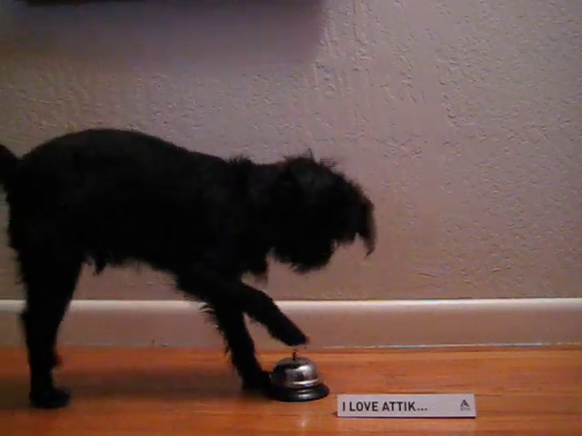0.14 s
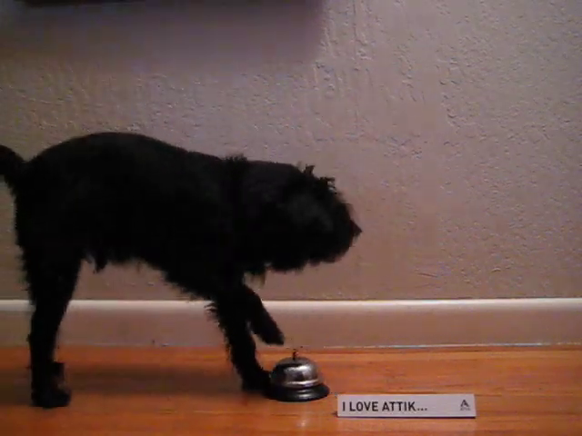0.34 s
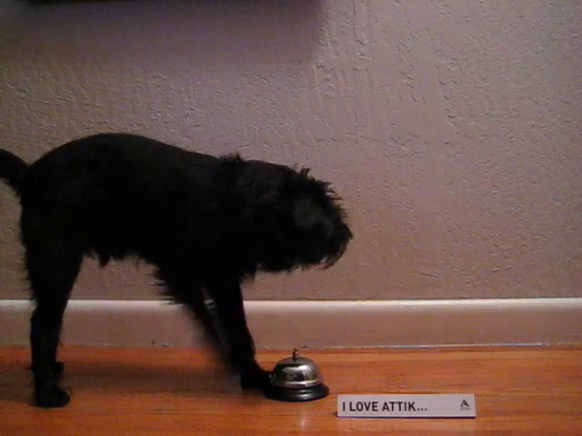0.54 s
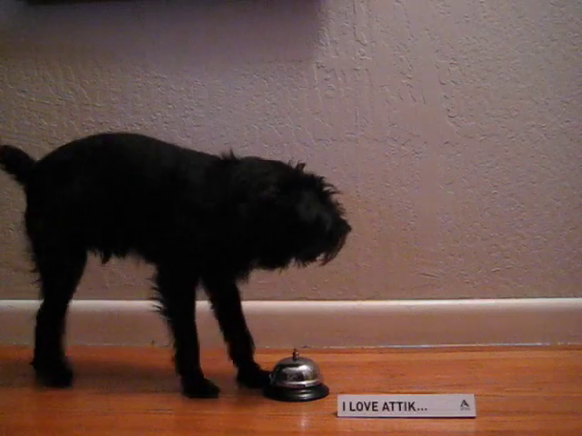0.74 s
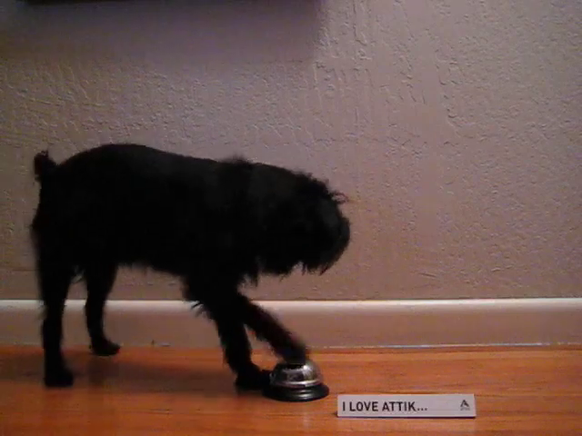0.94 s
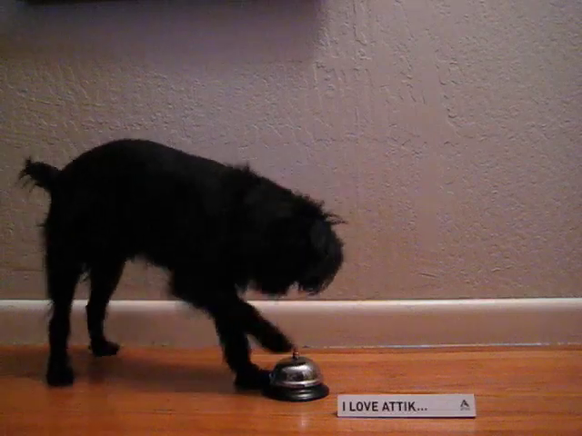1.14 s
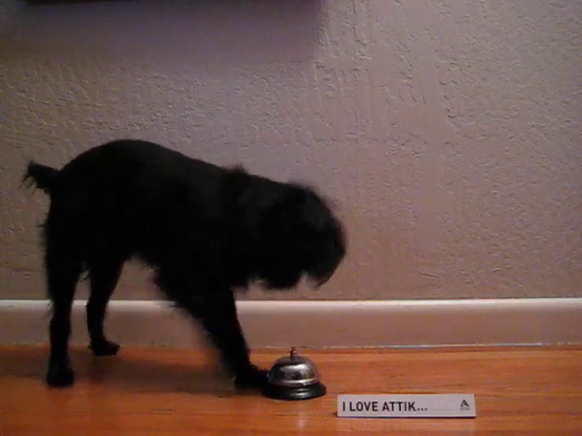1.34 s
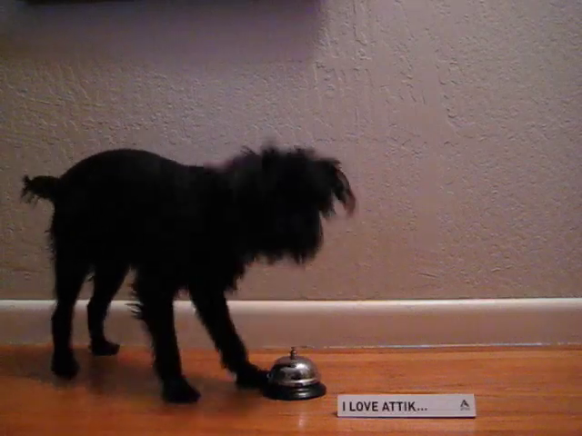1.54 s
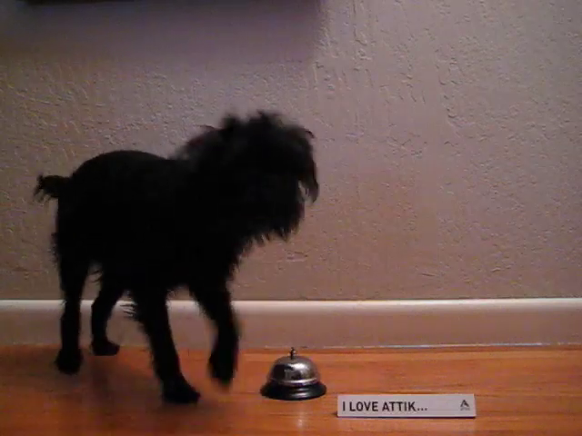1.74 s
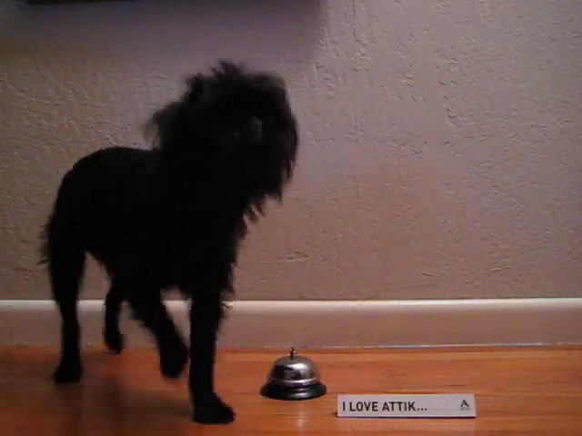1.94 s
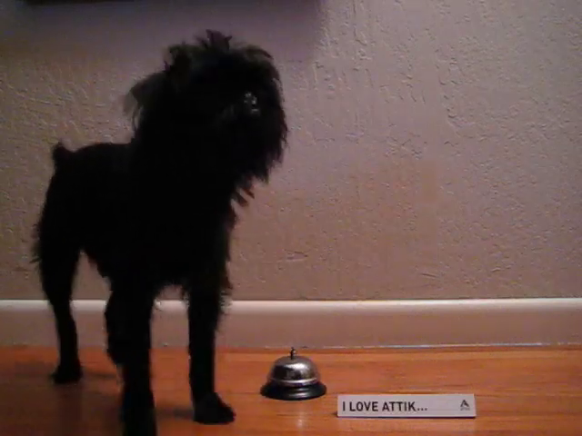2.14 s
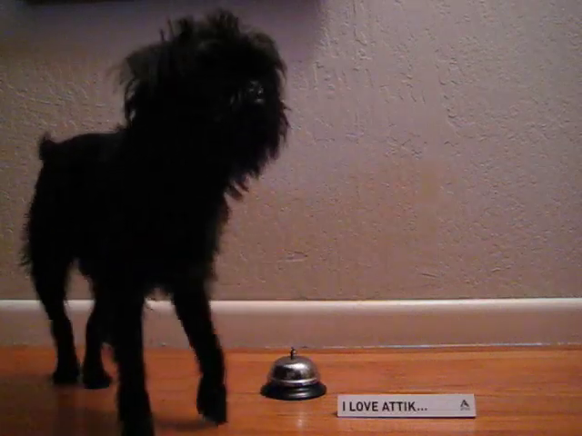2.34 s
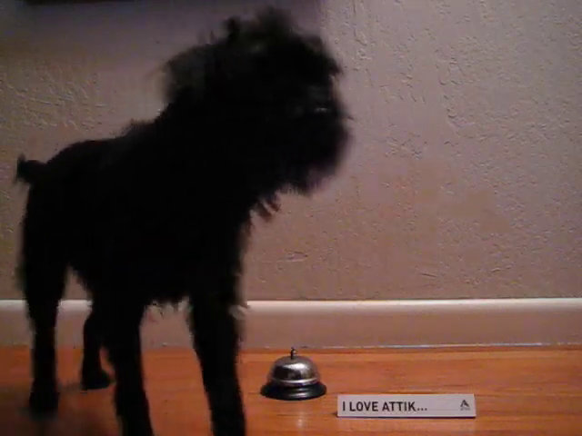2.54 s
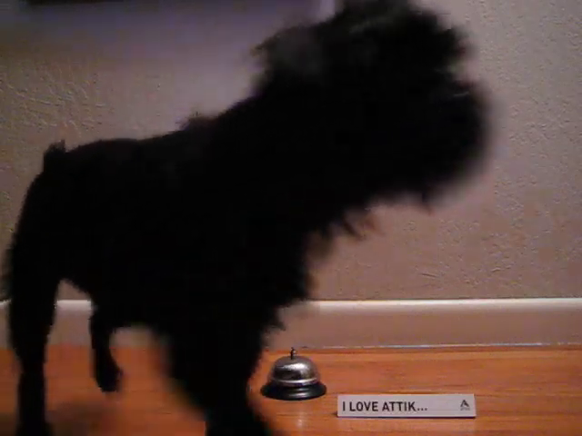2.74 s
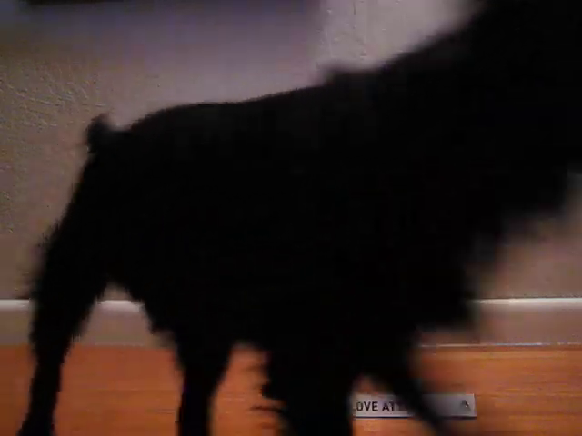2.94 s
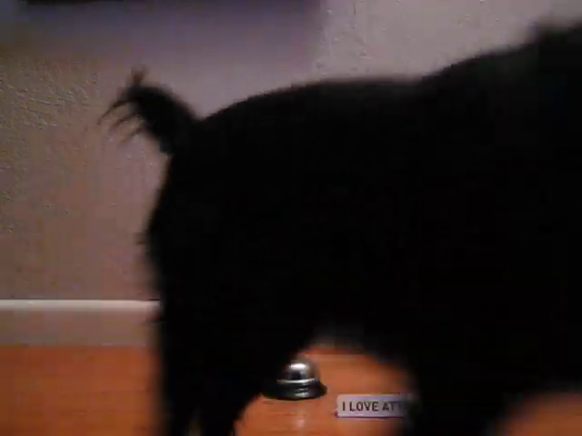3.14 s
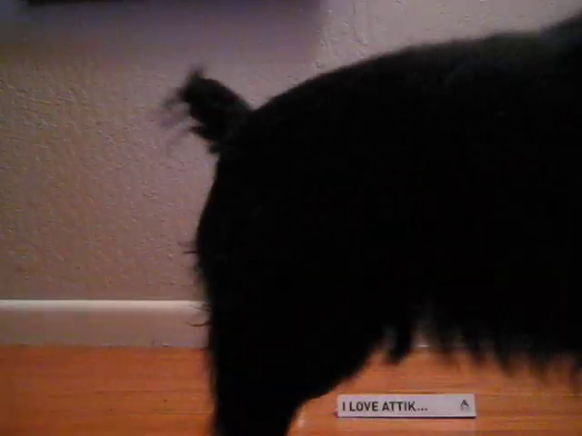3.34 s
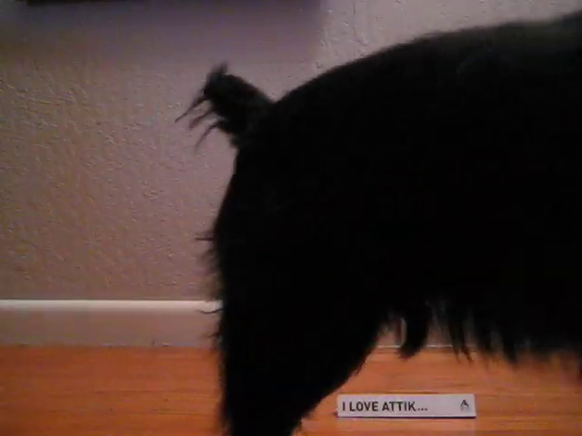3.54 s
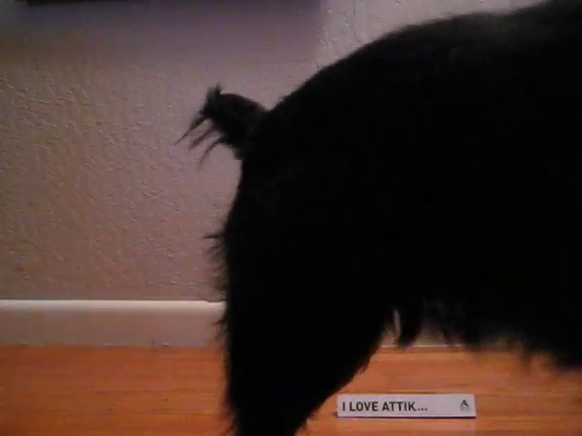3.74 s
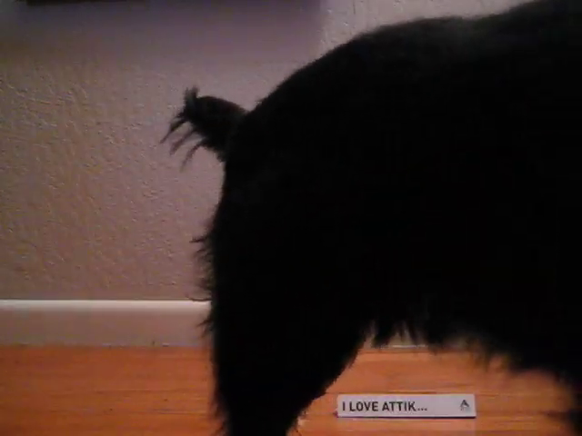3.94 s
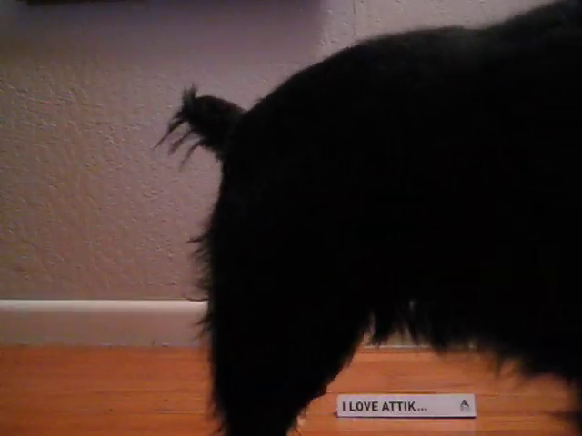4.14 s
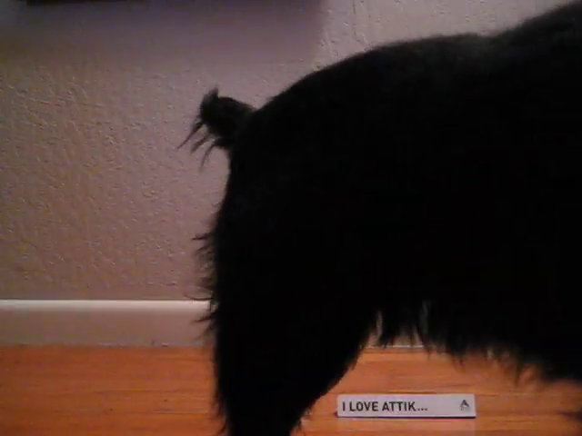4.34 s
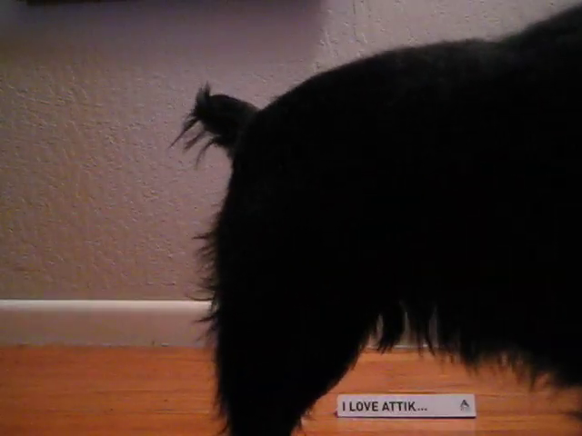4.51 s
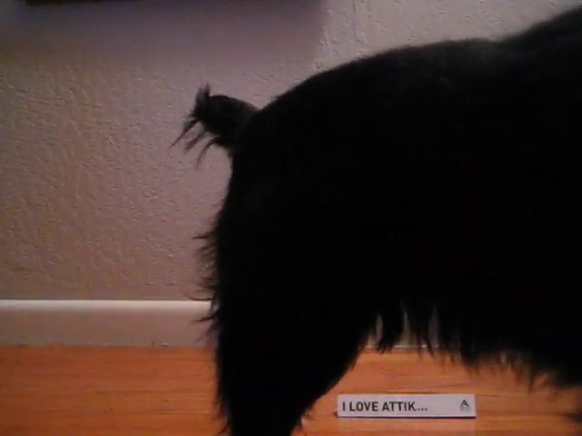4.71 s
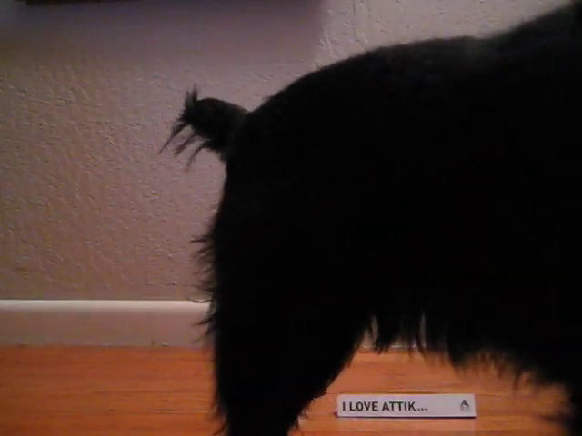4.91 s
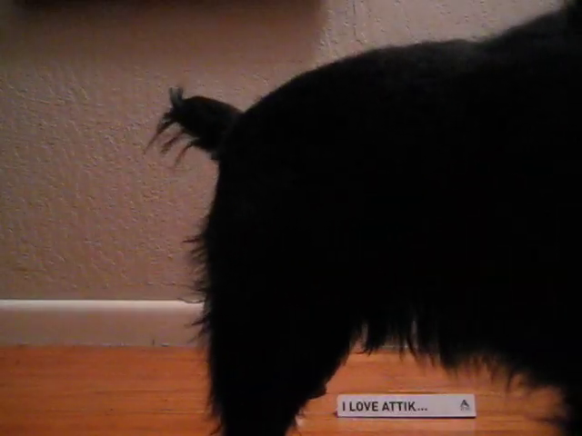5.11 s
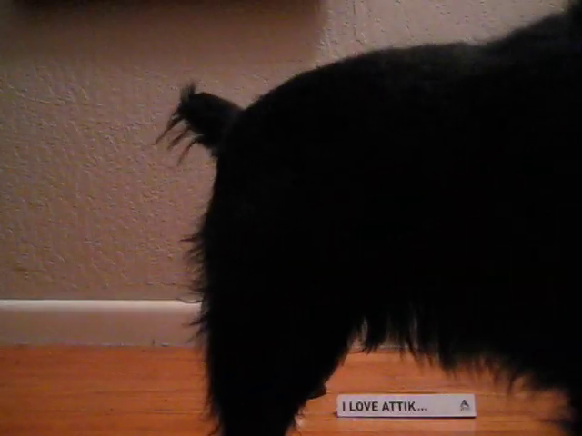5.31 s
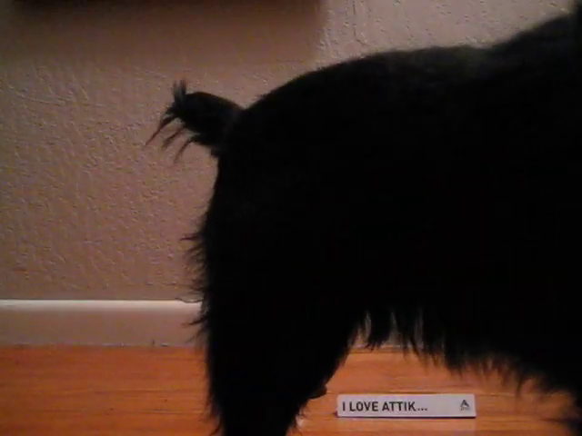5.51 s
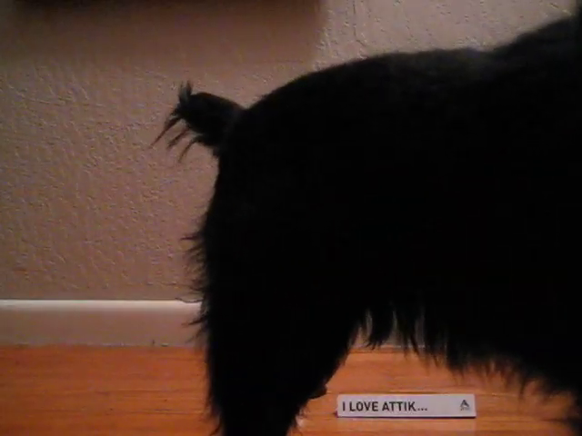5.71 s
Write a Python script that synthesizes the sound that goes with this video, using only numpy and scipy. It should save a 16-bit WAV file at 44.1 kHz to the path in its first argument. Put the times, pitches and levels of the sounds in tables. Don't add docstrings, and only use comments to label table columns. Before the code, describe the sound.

Indoors on a wooden floor, a dog's paw taps a steel desk bell: light metallic clicks, one hard plunger tap, then a bright piercing ding. The ring wavers and fades slowly while claws tick closer, followed by small scuffs and fur brushing right by the microphone. A steady fan rush with a thin whine sits behind and dips briefly under the strike.

```python
import sys
import numpy as np
from scipy import signal
from scipy.fft import rfft, irfft, next_fast_len
from scipy.io import wavfile
from scipy.ndimage import uniform_filter1d, minimum_filter1d

SR = 44100
rng = np.random.default_rng(int(sys.argv[2]) if len(sys.argv) > 2 else 0)


def bounce(signal):
    frames = np.transpose(np.atleast_2d(signal))
    limited = np.clip(frames, -1, 1)
    pcm = np.round(limited * 32767).astype(np.int16)
    wavfile.write(sys.argv[1], SR, pcm)


def ratio_of_db(decibels):
    return 10 ** (np.asarray(decibels, float) / 20)


N = 258867
T = np.arange(N) / SR
STRIKE_S = 1.3018


def curve(rows):
    return np.interp(T, *np.transpose(rows))


def fall(t, t60):
    return np.exp(-np.log(1000) * t / max(t60, 1e-4))


def band(x, lo_hz, hi_hz):
    return signal.sosfilt(signal.butter(2, [lo_hz, hi_hz], "band", fs=SR, output="sos"), x)


def add(out, s, x):
    i = int(s * SR)
    out[i:i + len(x)] += x[:N - i]


def add_peak(out, s, db, x):
    add(out, s, ratio_of_db(db) * x / np.abs(x).max())


def coloured(gain_at):
    n = next_fast_len(N)
    x = irfft(rfft(rng.standard_normal(n)) * gain_at(np.fft.rfftfreq(n, 1 / SR) + 1), n)[:N]
    return x / x.std()


def narrow(hz, width_hz):
    return coloured(lambda f: 1 / (1 + (2 * (f - hz) / width_hz) ** 2))


DOME_HZ = (1343.72, 3672.55, 6845.3, 10663.5)
# time in seconds, level in dB, share of the beating twin (0-1), lead of the twin in turns.
HUM_PARTIAL = [(1.31, -36.5, 0.15, 0.), (1.7, -32.5, 0.15, 0.075), (2.15, -27.5, 0.22, 0.037),
               (2.72, -31.5, 0.46, 0.), (3.02, -31.5, 0.35, 0.17), (3.4, -37, 0.46, 0.04),
               (4.13, -39, 0.46, 0.02), (4.87, -42.5, 0.74, 0.018), (5.87, -47.5, 0.53, 0.095)]
TONE_PARTIAL = [(1.309, -23.5, 0.13, -0.0041), (1.355, -28.5, 0.99, 0.031), (1.48, -19, 0.15, 0.0046),
                (2.019, -16.5, 0.054, 0.), (2.2, -21, 0.1, 0.0047), (2.46, -18.5, 0.23, -0.0054),
                (2.56, -25, 0.29, 0.), (2.72, -25, 0.47, -0.042), (2.8, -31, 0.85, 0.0021),
                (2.98, -30.5, 0.54, -0.015), (3.2, -39.5, 0.078, -0.011), (3.5, -35, 0.26, -0.013),
                (3.9, -43.5, 0.65, 0.), (4.15, -47.5, 0.71, 0.038), (4.65, -50, 0.55, 0.004),
                (4.87, -53.5, 0.46, -0.0041), (5.3, -59, 0.56, 0.), (5.87, -65, 0.65, 0.)]
UPPER_PARTIAL = [(1.309, -27, 0.9, -0.86), (1.326, -28, .6, -.4), (1.355, -30, 0.99, -0.13),
                 (1.49, -26.5, .5, 0.2), (1.58, -31, 0.41, 0.43), (1.674, -39, 0.33, -0.11),
                 (1.76, -36.5, 1, -0.021), (1.84, -41.5, .45, .08), (2.1, -44.5, 0.39, 0.018),
                 (2.451, -69, .5, 0.22)]
# time in seconds, level in dB.
TOP_PARTIAL = [(1.301, -22), (1.306, -26), (1.318, -33), (1.33, -26), (1.375, -25), (1.44, -31), (1.5, -48),
               (1.68, -58), (1.72, -72)]
# Hz above the partial, a moment in seconds when both cancel.
TWINS = [(2.786, 4.87), (1.405, 4.164), (11.9, 1.76), (13, 1.8)]


def dome():
    t = np.maximum(T - STRIKE_S, 0)
    out = np.zeros(N)
    partials = (HUM_PARTIAL, TONE_PARTIAL, UPPER_PARTIAL, TOP_PARTIAL)
    for hz, rows, (beat_hz, null_s) in zip(DOME_HZ, partials, TWINS):
        level_db = curve([row[:2] for row in rows])
        share, lead = 0.1, 0
        if len(rows[0]) > 2:
            share = curve([(row[0], row[2]) for row in rows])
            lead = curve([(row[0], row[3]) for row in rows])
        twin = np.sin(2 * np.pi * (hz * t + beat_hz * (T - null_s) + lead))
        pair = np.sin(2 * np.pi * hz * t) - np.clip(share, 0, 1) * twin
        if rows is HUM_PARTIAL:
            pair = pair + ratio_of_db(-31) * np.sin(2 * 2 * np.pi * hz * t)
        if rows is TONE_PARTIAL:
            since_dip = T - 1.46
            pump = np.cos(2 * np.pi * TWINS[2][0] * since_dip) * fall(np.maximum(since_dip, 0), 0.35)
            level_db = level_db - 2.4 * pump
        fade = np.exp(-np.maximum(T - rows[-1][0], 0) / 0.05) * (t > 0)
        out += np.sqrt(2) * ratio_of_db(level_db) * fade * pair
    return out


# start in seconds, hum level in dB, tone level in dB, t60 in seconds.
TOUCHES = [
    (0, -45, -46, 0.41),
    (.519, -52, -52, 5.2),
]


def touches():
    out = np.zeros(N)
    for s, hum_db, tone_db, t60 in TOUCHES:
        hum = ratio_of_db(hum_db) * np.sin(2 * np.pi * DOME_HZ[0] * T)
        tone = ratio_of_db(tone_db) * np.sin(2 * np.pi * DOME_HZ[1] * T)
        out += (hum + tone) * fall(np.maximum(T - s, 0), t60) * (T >= s) * (T < STRIKE_S)
    return out


# Hz, peak in dB.
UNCLAMPED = [(3687, -22), (6844, -22), (10318, -17), (11169, -16), (9713, -26), (15266, -34)]
SHORT_HZ = (3187, 3620, 4034, 4393, 4780, 8323, 9318, 10290, 11185, 13960, 14970, 15620)
# level in dB, t60 in seconds, width in Hz.
SHORT_MODES = [(-44.5, 1, 66), (-35, 0.7, 330), (-41.5, 1.8, 70), (-47.5, .6, 90), (-44, 1.06, 120),
               (-44, 0.4, 300), (-41, .33, 90), (-28, 0.45, 130), (-35.5, 0.53, 60), (-49, .16, 300),
               (-41, .25, 220), (-49.5, 0.13, 200)]


def clapper():
    t = np.maximum(T - STRIKE_S, 0)
    struck = T >= STRIKE_S
    opening = struck / (1 + (t / 0.0039) ** 8)
    out = ratio_of_db(-19.5) * band(rng.standard_normal(N) * opening, 250, 11500)
    for hz, db in UNCLAMPED:
        out += opening * ratio_of_db(db) * np.sin(2 * np.pi * hz * t)
    for hz, (db, t60, width_hz) in zip(SHORT_HZ, SHORT_MODES):
        out += ratio_of_db(db) * struck * fall(t, t60) * narrow(hz, width_hz)
    return out


# level in dB, t60 in seconds, low edge in Hz, high edge in Hz.
WASH = [
    (-35.5, 0.95, 4500, 13000),
    (-41.5, .35, 11000, 18000),
    (-40, .5, 1500, 3200),
]


def wash():
    out = np.zeros(N)
    for db, t60, lo_hz, hi_hz in WASH:
        noise = rng.standard_normal(SR) * fall(T[:SR], t60)
        add(out, STRIKE_S, ratio_of_db(db) * band(noise, lo_hz, hi_hz))
    return out


PLUNGER_HZ = (3620, 4450, 4940, 6380, 8450, 9320, 10100, 11300, 15200, 3240)
# width in Hz, level in dB.
PLUNGER_MODES = [(170, 5.5), (200, 7.5), (100, 3.5), (130, 5.5), (150, 2), (60, -2), (120, -11),
                 (80, -12.5), (250, -20), (60, -8)]
# start in seconds, peak in dB, rattle length in seconds, after-ring in dB.
TAPS = [
    (.1146, -34, .004, -40),
    (.333, -39, .014, -25),
    (.5148, -22, .004, -30),
    (.5186, -8, .0035, -21),
    (1.0245, -34, .004, -45),
    (1.2565, -33, .004, -25),
    (1.282, -30, .008, -30),
    (1.2975, -24, .004, -30),
    (1.385, -27, .002, -40),
    (1.4486, -27, .002, -40),
]


def plunger():
    out, t = np.zeros(N), T[:SR // 4]
    for s, db, length_s, ring_db in TAPS:
        shape = np.exp(-t / max(length_s, 3e-4)) + ratio_of_db(ring_db) * fall(t, 0.74)
        push = rng.standard_normal(len(t)) * shape
        rattle = np.zeros(len(t))
        for hz, (width_hz, mode_db) in zip(PLUNGER_HZ, PLUNGER_MODES):
            rattle += ratio_of_db(mode_db) * signal.lfilter(*signal.iirpeak(hz, hz / width_hz, SR), push)
        add_peak(out, s, db, rattle)
    return out


# time in
# seconds, tick level in dB, tick pitch in Hz, board knock in dB, dry snap in dB.
CLAW_TICKS = [(.6414, -15, 5960, -13, -12), (.6538, -31, 6000, -29, -34), (.678, -55, 8300, -55, -28),
              (.672, -27, 4600, -26, -60), (.859, -22, 5600, -30, -25), (.8615, -20, 5100, -22, -21),
              (.875, -38, 6000, -50, -34), (.9554, -50, 3700, -39, -67), (1.6732, -42, 8630, -42, -37.5),
              (1.8703, -45, 5420, -44, -62.5), (1.9075, -27, 6240, -35, -53), (1.976, -22, 5820, -32, -37),
              (1.9894, -32.5, 8440, -42.5, -35), (2.2093, -38.5, 5580, -29, -64), (2.381, -23, 5200, -28, -41),
              (2.3907, -31, 8140, -31, -37), (2.4037, -43.5, 8250, -47, -46),
              (2.7097, -15.5, 8100, -21, -31), (2.712, -17.5, 3650, -20, -31), (2.715, -22, 5000, -25, -33),
        (2.723, -30, 8300, -36, -29), (2.741, -37, 6700, -43, -46), (2.9124, -19.5, 5600, -26, -28),
        (2.9388, -13, 8100, -20, -33), (2.944, -25, 4130, -43, -38), (2.9532, -35, 7750, -48, -36),
        (2.971, -38, 8300, -50, -49), (3.1404, -11, 4100, -20.5, -11.5), (3.154, -40, 8300, -41.5, -40),
        (3.2213, -31, 5800, -31, -33), (3.227, -26, 6600, -45, -26), (3.24, -28, 3770, -31, -28),
        (3.2553, -32, 4060, -27.5, -55), (3.3167, -40, 5460, -41, -35), (3.3445, -51, 4500, -45, -60),
        (3.5325, -35, 4400, -53, -55), (3.551, -38, 4400, -28, -55), (3.562, -20, 6400, -36, -27),
        (3.5895, -35, 5000, -42, -51), (3.694, -29, 5950, -55, -55),
              (4.1106, -27, 4500, -55, -58), (4.337, -55, 4500, -39, -60), (4.3774, -22, 5300, -25, -27.5),
         (4.3783, -36, 5500, -26, -25.5), (4.3863, -37, 6000, -55, -22), (4.635, -40, 8300, -53, -30),
         (4.6473, -42, 8900, -55, -13.5), (4.6849, -15, 3540, -37, -38), (4.7208, -44, 3700, -34, -67),
         (4.8524, -52, 6500, -45, -36), (4.956, -26.5, 3570, -47, -56), (5.0097, -48, 6500, -50, -30),
         (5.0178, -34, 5500, -49, -29.5), (5.0282, -52, 8300, -40, -16), (5.066, -33, 3700, -40, -30),
         (5.1186, -38, 3300, -41, -51), (5.183, -43, 9500, -30.5, -30), (5.2192, -38, 4200, -34, -38),
         (5.2363, -29, 4300, -36, -28), (5.2412, -44, 8300, -39, -25),
              (5.2962, -50, 6500, -55, -24), (5.306, -50, 6500, -50, -27), (5.3113, -35, 3700, -37, -24),
              (5.318, -49, 3700, -38, -53), (5.5455, -34, 3730, -31, -23), (5.5662, -33, 5160, -44, -46),
              (5.614, -43, 8800, -22.5, -10.5), (5.6156, -39, 4000, -24, -15), (5.622, -39, 6700, -37, -23),
              (5.632, -33, 3680, -31, -60), (5.649, -34, 3660, -55, -51), (5.658, -50, 8300, -55, -31),
              (5.678, -51, 7500, -40, -41), (5.801, -51, 3900, -55, -31), (5.2295, -36, 4000, -31, -50),
              (5.5408, -42, 3800, -38.5, -40), (5.5935, -44, 4000, -43, -60)]


def claws():
    out, t = np.zeros(N), T[:1024]
    hz = np.fft.rfftfreq(len(t), 1 / SR)
    lead = 64

    def bump(centre_hz, octaves):
        return 1 / (1 + np.abs(np.log2((hz + 1) / centre_hz) / octaves) ** 2.5)

    edges = 1 + (1150 / (hz + 1)) ** 4 + (hz / 15500) ** 8
    for s, tick_db, tick_hz, knock_db, snap_db in CLAW_TICKS:
        scratch = 0.25 * rng.standard_normal(len(t)) * np.exp(-t / 0.0008)
        scratch[0] = 1
        tick = ratio_of_db(tick_db + 22) * bump(tick_hz, 0.06 * tick_hz / 1e3)
        knock = ratio_of_db(knock_db + 24) * bump(2400, 0.62)
        snap = ratio_of_db(snap_db + 11.5) * bump(12600, 0.3)
        colour = (tick + knock + snap) * ratio_of_db(-2) / edges
        add(out, s - lead / SR, np.roll(irfft(rfft(scratch) * colour * -1j), lead))
    return out


# start in seconds, peak
# in dB, centre in Hz, t60 in seconds.
THUMPS = [(0, -32, 1380, 0.26), (0.519, -33, 3800, 0.4), (0.522, -37.5, 170, 0.18),
          (1.286, -31, 1900, 0.06), (1.297, -33, 1100, 0.02), (1.302, -38, 320, 0.02),
          (1.301, -44, 60, 0.06), (0., -36, 4000, .2), (1.33, -47, 190, 0.12), (4.377, -22, 1300, 0.008),
          (5.0, -36, 173, 0.25), (5.04, -39, 240, 0.27)]


def thumps():
    out, t = np.zeros(N), T[:SR // 4]
    for s, db, hz, t60 in THUMPS:
        add_peak(out, s, db, band(rng.standard_normal(len(t)) * fall(t, t60), 0.6 * hz, 1.6 * hz))
    return out


# start in seconds, peak in dB, centre in Hz, t60 in seconds. Dull scuffs of pads and
SCUFFS = [(.64, -24.5, 2140, 0.055), (.861, -28, 2110, 0.036), (4.684, -18.5, 3550, 0.016),
          (4.72, -30, 1780, .03), (4.81, -31, 1100, 0.047), (4.836, -36.5, 700, 0.044),
          (4.85, -43, 2100, .03), (4.885, -46, 2120, .03), (5.011, -42, 2800, .02), (5.03, -38, 3300, .03),
          (5.07, -39, 2100, 0.078), (5.127, -39, 2150, .04), (5.183, -36, 1090, .03),
          (5.236, -33, 3200, .04), (5.242, -35, 1500, .03), (5.308, -42, 3300, 0.031),
          (5.319, -30.5, 2130, 0.054)]
BURSTS = [(.9545, -34, 2180, .015), (1.026, -27.5, 4560, 0.032), (1.0255, -28.5, 8900, 0.085),
          (1.026, -38, 3220, .04), (1.673, -35, 3150, 0.13), (1.673, -36.5, 9100, 0.14),
          (1.674, -39, 12200, .15), (2.939, -20, 8700, 0.01), (2.95, -38, 8200, .3),
          (3.14, -19.5, 9000, .012), (3.146, -32, 8900, 0.15), (3.534, -37, 4710, .03),
          (4.371, -27, 3900, 0.025), (4.372, -36.5, 12500, .01), (4.379, -21.5, 1400, 0.019),
          (4.405, -39, 12800, .012), (4.4155, -39, 11800, .012), (5.306, -28, 13000, 0.0074),
          (5.311, -25.5, 13100, .008), (5.432, -40, 10500, .008), (5.56, -37, 11600, .008),
          (5.6225, -29, 11000, .02), (5.627, -32, 12500, .012), (5.637, -36, 12000, .03),
          (5.678, -39, 11100, .01), (1.302, -29.5, 660, 0.0097), (.862, -29, 9400, 0.12),
          (.862, -25, 3930, 0.062), (4.474, -43, 11000, .008), (4.625, -40, 8000, .008),
          (4.691, -39, 10500, .02), (.652, -30, 10400, .04), (5.0, -46, 2500, 0.27),
          (2.713, -25, 4300, 0.056),
          (1.304, -22, 8000, .06), (1.304, -23, 10000, .05), (1.272, -34, 4000, .04),
         (1.287, -27, 3000, .03), (1.302, -20.5, 2180, .01), (2.939, -14.5, 4030, .008),
         (2.945, -35, 10800, 0.23), (2.917, -31, 5200, .015), (2.945, -31, 3900, 0.43),
         (2.945, -32, 5500, .3), (2.7, -30.5, 2630, .1), (4, -28, 3300, .08), (.646, -32, 6000, .08),
         (.87, -38, 9800, .03), (1.5, -33, 3100, .06), (1.2, -44, 630, .25), (1.385, -29, 8000, .03),
         (1.8, -25, 5600, 0.034), (5.08, -42, 1900, .05), (6.2, -35, 2000, 0.055), (6.6, -35, 6500, .01),
         (1.303, -22, 9200, .02), (4.378, -31, 5500, 0.034), (2.971, -31, 7700, .02),
         (0.48, -33, 6400, .02)]


def scuffs():
    out, t = np.zeros(N), T[:SR // 8]
    width = 1.124
    for s, db, hz, t60 in SCUFFS + BURSTS:
        add_peak(out, s, db, band(rng.standard_normal(len(t)) * fall(t, t60), hz / width, hz * width))
    return out


# start in seconds, length in seconds, level in dB.
RUSTLES = [
    (4.77, .14, -46.5),
    (4.955, 0.19, -45),
    (5.17, 0.19, -44.5),
    (5.597, .14, -42),
]


def rustle():
    grains_per_s, grain_s, spread_db = 160, 0.0024, 5.5
    size = (rng.random(N) < grains_per_s / SR) * ratio_of_db(spread_db * rng.exponential(size=N))
    grains = signal.lfilter([1], [1, -np.exp(-1 / (grain_s * SR))], size) * rng.standard_normal(N)
    grains = band(grains, 600, 3100)
    swell = sum(ratio_of_db(db) * np.sin(np.pi * np.clip((T - s) / length, 0, 1)) for s, length, db in RUSTLES)
    return swell * grains / grains.std()


# delay in seconds, level in dB.
ECHOES = [(.0032, -7.5), (.008, -16), (0.012, -13.5), (0.03, -22.5)]
# time in seconds, level in dB.
ROOM_SHARE = [(0, -16), (.55, -14.5), (.68, -5), (1.5, 5), (2.6, -4.5), (3.3, -4.5), (4.2, -7.5),
              (5.87, -10.5)]


def room(x):
    t = T[:SR // 2]
    noise = rng.standard_normal(len(t))
    low = signal.lfilter(*signal.butter(1, 5000, fs=SR), noise)
    treble = ratio_of_db(-0.5) * (noise - low)
    tail = low * fall(t, 0.5) + treble * fall(t, 0.13)
    tail *= 1 - np.exp(-t / 0.0014)
    tail *= ratio_of_db(-1.5) / np.sqrt(np.sum(tail ** 2))
    for s, db in ECHOES:
        tail[int(s * SR)] += ratio_of_db(db)
    return x + signal.fftconvolve(x * ratio_of_db(curve(ROOM_SHARE)), tail)[:N]


# Hz, level in dB.
FLOOR = [(15, -66.5), (25, -19.5), (189, -8), (540, -10), (652, -7.5), (1210, -10), (1310, -8.5),
         (1430, -12), (3470, -19.5), (3760, -17.5), (4080, -20.5), (5950, -25), (7580, -27.5),
         (10300, -27.5), (12900, -32.5), (15700, -26.5)]
# Hz, level in dB.
WHISTLES = [(5055, -73.5), (7558, -63), (15149, -87), (15735, -88)]
# centre in Hz, level in dB, width in Hz.
WHINE = [(239, -56, 45), (717, -55.5, 6.2), (950.5, -54, 16), (4980, -66, 170), (7800, -65, 250),
         (15150, -64, 250)]


def floor():
    hz, db = np.transpose(FLOOR)
    out = ratio_of_db(-40) * coloured(lambda f: ratio_of_db(np.interp(np.log(f), np.log(hz), db)))
    for line_hz, line_db in WHISTLES:
        out += np.sqrt(2) * ratio_of_db(line_db) * np.sin(2 * np.pi * line_hz * T)
    for line_hz, line_db, width_hz in WHINE:
        out += ratio_of_db(line_db) * narrow(line_hz, width_hz)
    return out


REST_DB = -2.5


def gain_db(dip_db=-13):
    duck_db, hold_s, release_s, dip_s = -7, 0.44, 0.16, 0.05
    t = np.maximum(T - STRIKE_S, 0)
    held = np.clip(t / 0.008, 0, 1) * np.clip((hold_s + release_s - t) / release_s, 0, 1)
    return REST_DB + duck_db * held + dip_db * t / dip_s * np.exp(-t / dip_s)


def scene():
    bell = dome() + touches() + clapper() + wash()
    in_room = room(plunger() + claws() + thumps())
    close = scuffs() + rustle()
    tone = floor()
    rumble = signal.lfilter(*signal.butter(2, 140, fs=SR), tone)
    ducked = ratio_of_db(gain_db()) * (tone - rumble) + ratio_of_db(0.58 * gain_db()) * rumble
    return (bell + in_room + close + ducked)[None]


def band_limit(x):
    return signal.sosfilt(signal.butter(12, 16830, fs=SR, output="sos"), x)


def record(dry):
    hz, s, bins = signal.stft(dry, SR, nperseg=1024)
    power = np.abs(bins[0]) ** 2
    # 43 dB per octave upwards, 128 downwards
    octaves = np.log2((hz[:, None] + 1) / (hz + 1))
    slope_db = np.where(octaves > 0, 43, -128) * octaves
    spread = ratio_of_db(-24.5 - slope_db) ** 2 * (hz > 3050)
    mask = spread @ minimum_filter1d(power, size=5, axis=1)
    gain = gain_db(-30)
    lowest_db = np.minimum(np.interp(s, T, gain), np.interp(s - 0.09, T, gain))
    spare = ratio_of_db(2.3 * (lowest_db - REST_DB)) ** 2
    bands = uniform_filter1d(uniform_filter1d(power, size=7, axis=0), size=3, axis=1)
    bins[:, bands < spare * mask] *= ratio_of_db(-42)
    treble = power[hz > 11000].sum(axis=0)
    sharp = treble > 14 * np.median(treble)
    bins[:, hz > 15850] *= ratio_of_db(np.where(sharp, -14, -45))
    mix = signal.istft(bins, SR)[1][:, :N]
    return band_limit(mix)


dry = scene()
out = record(dry)
bounce(out)
```